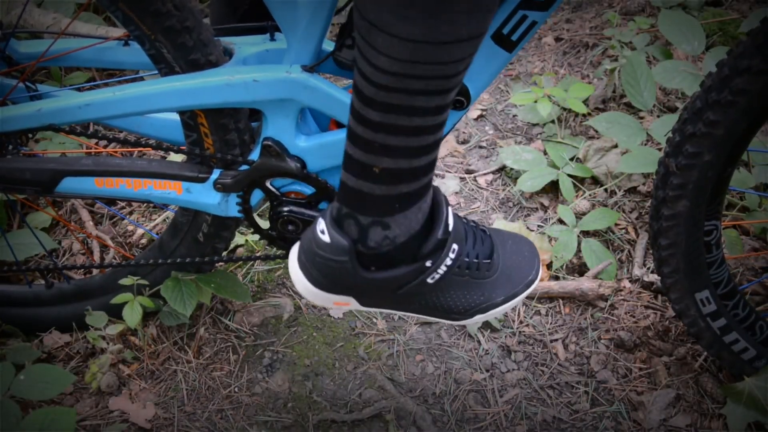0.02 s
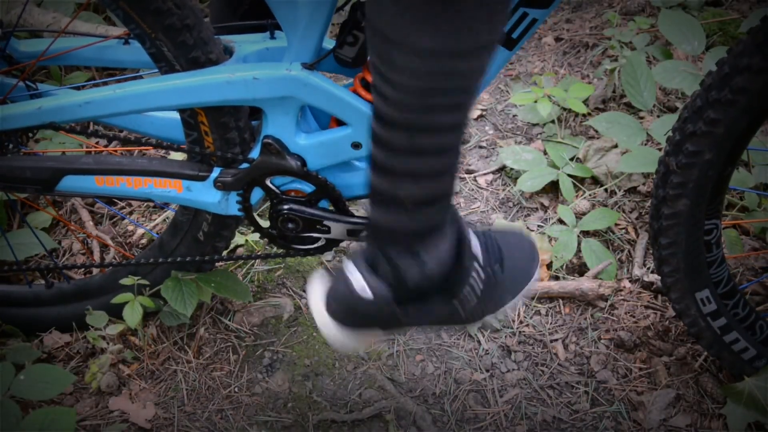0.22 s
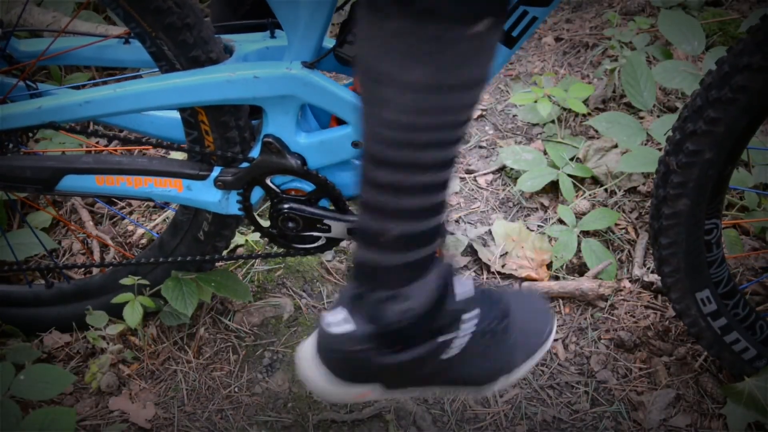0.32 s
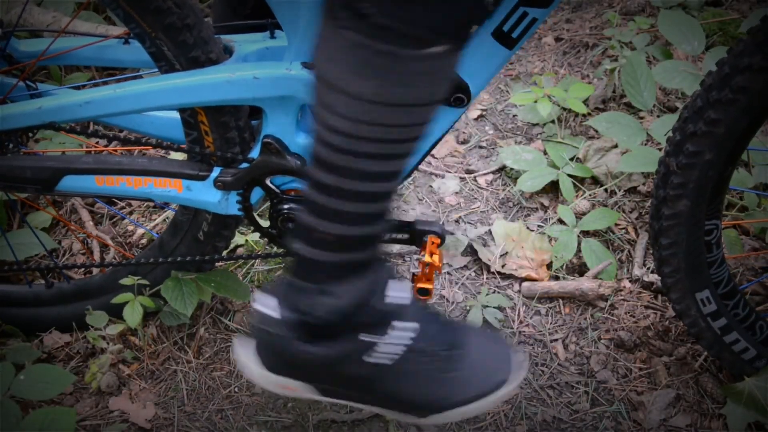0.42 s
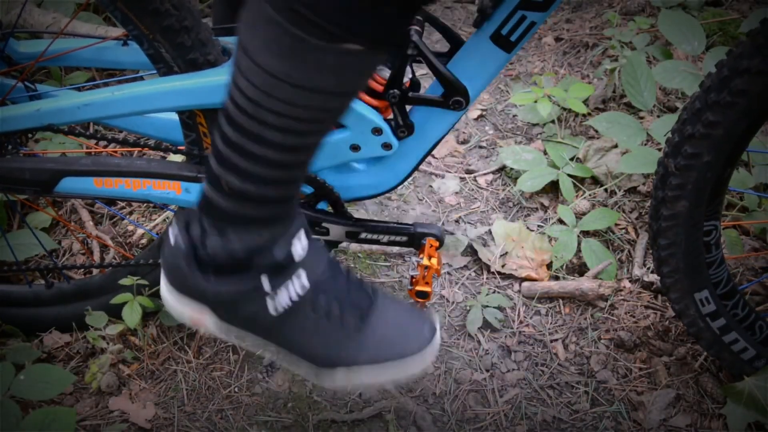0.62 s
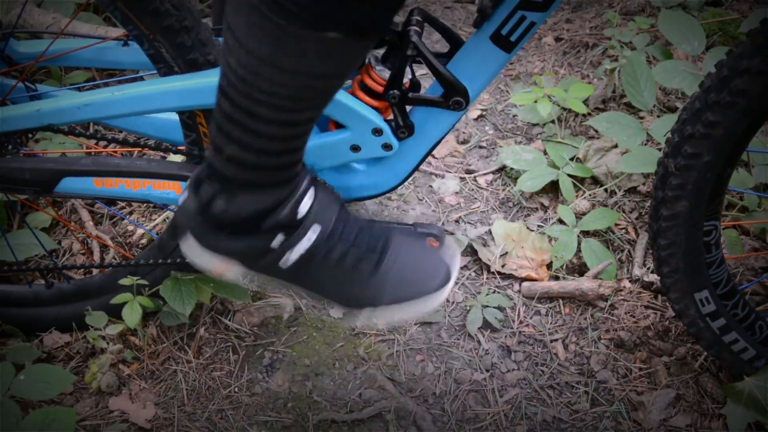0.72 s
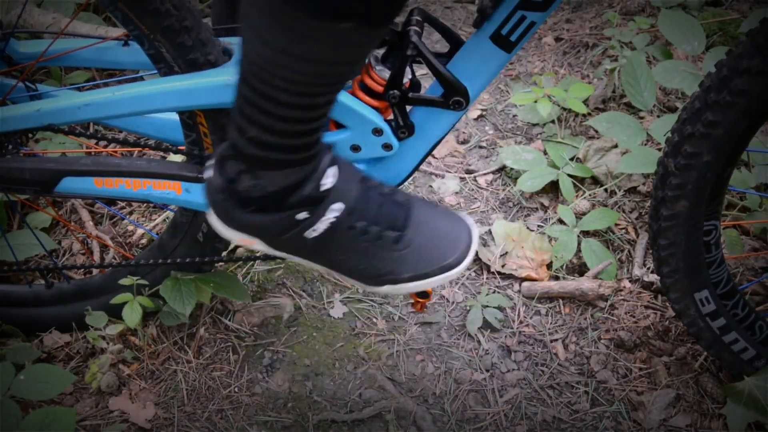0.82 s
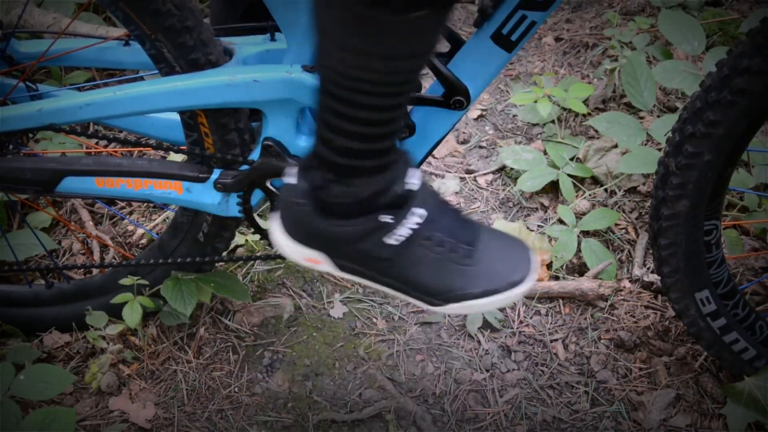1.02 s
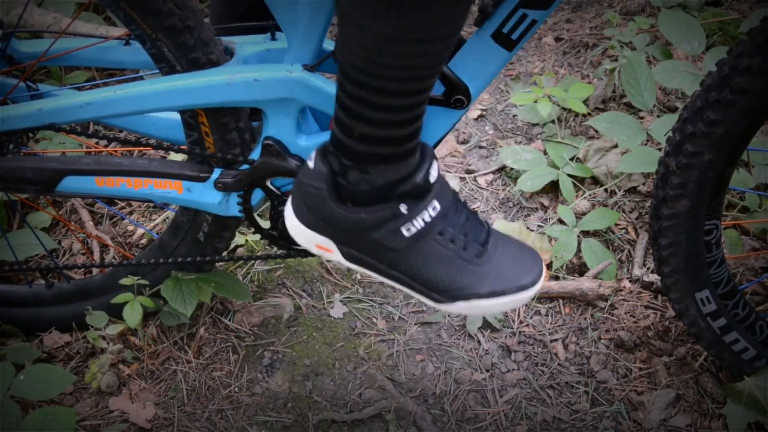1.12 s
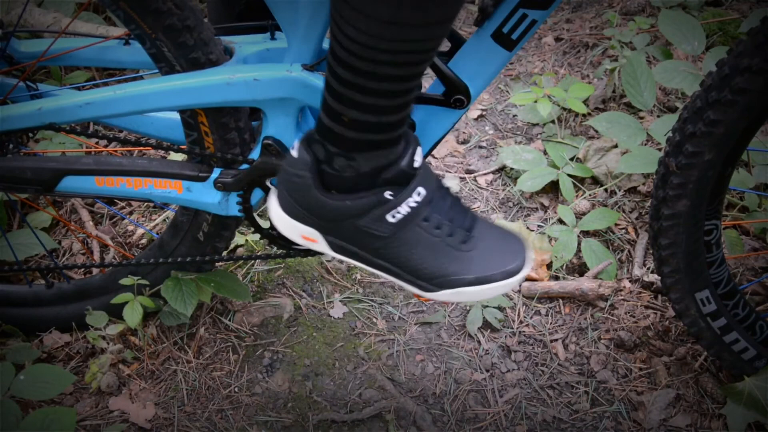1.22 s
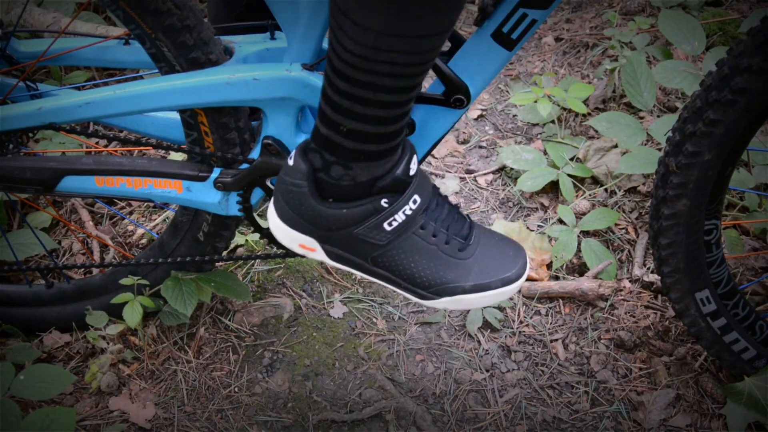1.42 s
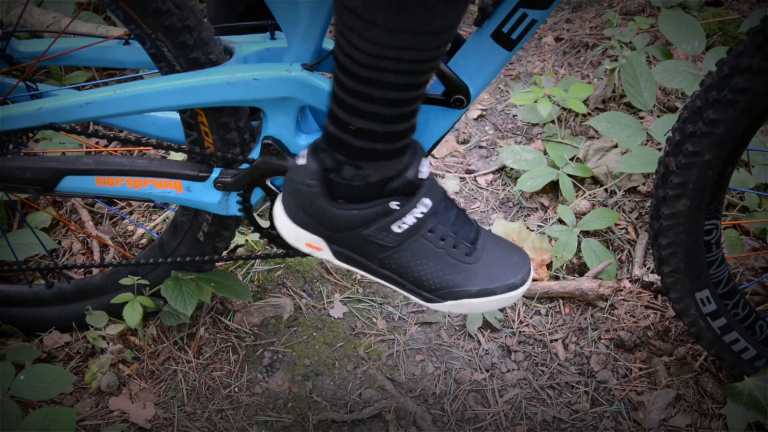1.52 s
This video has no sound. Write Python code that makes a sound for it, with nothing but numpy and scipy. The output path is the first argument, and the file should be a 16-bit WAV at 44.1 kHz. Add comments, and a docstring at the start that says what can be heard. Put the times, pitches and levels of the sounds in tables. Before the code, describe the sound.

A spring-loaded bicycle pedal snaps loudly as a shoe twists out, then ticks and knocks

```python
"""Bicycle pedal release on a forest trail

A shoe twists out of a spring-loaded pedal: the steel jaw snaps shut, loud enough to overload the microphone.
The cleat ticks three times on the free pedal; the sole knocks and scuffs. Trees echo it over a steady hiss.
Impacts are coloured noise bursts plus decaying sine modes, scuffs are swelling noise bursts,
the echo is convolution with a shaped noise tail, and the hiss is filtered noise."""
import sys
import numpy as np
from scipy import signal
from scipy.fft import rfft, irfft
from scipy.io import wavfile
from scipy.ndimage import uniform_filter1d

SR = 44100
rng = np.random.default_rng(int(sys.argv[2]) if len(sys.argv) > 2 else 0)


def pcm_store(signal):
    """Save signal as 16-bit PCM."""
    levels = np.round(np.clip(np.atleast_2d(signal), -1, 1) * 32767)
    wavfile.write(sys.argv[1], SR, levels.astype(np.int16).T)


N = 70560
RING_S = np.arange(8192) / SR  # time axis of one near sound


def snap(crack_db, ring_db, rattle_db, thump_db):
    """The jaw slams home, rings, and shakes the crank and frame."""
    # crack spectrum: freq_hz, level_db
    crack_colour = [(40, -22.5), (150, -22.5), (380, -21.5), (700, -21.5), (1000, -8), (1700, 0),
                    (2050, -10.5), (3100, -1.5), (3520, -8.5), (3950, -3.5), (5800, -2.5), (7600, -9),
                    (8400, -0.5), (9500, -10), (11000, -1), (12800, -12), (13700, -8.5), (15500, -21)]
    # rattle spectrum: freq_hz, level_db
    rattle_colour = [(80, -13.5), (300, -3), (700, 4.5), (1000, -2), (1700, 2.5), (3000, -2.5),
                     (6000, -3.5), (11000, -6), (15500, -18)]
    # jaw and spring modes: freq_hz, level_db, t60_s
    jaw_modes = [(1670, -12, .04), (2640, -11, .04), (3005, -7, .05), (3975, -8, .04), (4190, -9, .04),
                 (4655, -9, .04), (5420, 0, .048), (6280, -8, .04), (7050, -9, .035), (8200, -5, .035),
                 (8540, -2, .028), (10500, -8, .03), (11130, -3, .036), (13600, -10, .033)]
    # crank and frame modes: freq_hz, level_db, t60_s
    frame_modes = [(403.7, -4, 0.01), (685, 0, 0.013), (850, -2, 0.012), (1090, -7, 0.014),
                   (1380, -1, 0.015)]
    crack = burst(blow(hold_s=.0019, t60_s=.0083), crack_colour)
    rattle = burst(blow(hold_s=0, t60_s=.11), rattle_colour)
    out = amp(crack_db) * crack
    out = out + amp(ring_db) * ring(jaw_modes, rise_s=.001)
    out = out + amp(rattle_db) * rattle
    return out + amp(thump_db) * thud(frame_modes)


def tick(crack_db, ring_db, bright_db_per_octave):
    """Steel touches the unloaded pedal, which buzzes and rings briefly."""
    # contact spectrum: freq_hz, level_db
    tick_colour = [(100, -16), (600, -30), (1000, -9), (1500, 8), (2150, 0), (2900, 8.5), (3300, -7.5),
                   (3900, 2), (4700, -4.5), (5300, -3), (6000, -6), (7400, 0), (8800, 2.5), (9500, -6),
                   (14000, -5.5), (15800, -20)]
    # free pedal modes: freq_hz, level_db, t60_s
    pedal_modes = [(910, -12, .04), (1385, -4, .08), (1615, -4, .05), (1770, -9, .04), (2700, -9, .06),
                   (2870, 0, .04), (2970, -6, .03), (3540, -10, .04), (3820, -9, .03), (4360, -7, .04),
                   (5170, -7, .05), (5350, -10, .03), (5950, -11, .03), (6420, -6, .037), (7200, -7, .025),
                   (7520, -4, .03), (8100, -9, .02), (8520, -9, .028), (8870, -8, .028)]
    buzz_db = -14.5
    envelope = blow(hold_s=.0018, t60_s=.0075) + amp(buzz_db) * blow(hold_s=0, t60_s=.11)
    crack = burst(envelope, tick_colour, bright_db_per_octave)
    pedal_ring = ring(pedal_modes, bright_db_per_octave, rise_s=.0001)
    return amp(crack_db) * crack + amp(ring_db) * pedal_ring


def knock(thud_db, pitch_ratio, contact_db, treble_db, top_db, ring_db):
    """The stiff sole thuds; the cleat makes contact just after and rings, damped by the shoe."""
    # sole modes at pitch ratio 1: freq_hz, level_db, t60_s
    sole_modes = [(375, -15.5, .025), (649.6, -10, 0.058), (835, -4, 0.035), (1345, 0.5, .016),
                  (1788, -14.5, 0.01143)]
    # contact spectrum before the treble and top gains: freq_hz, level_db
    contact_colour = [(200, -16), (1000, 0.5), (1900, 6.5), (2600, 2), (3350, 4.5), (3900, -11),
                      (4900, -3.5), (6000, -13), (7000, -4), (8500, -10), (9500, -12), (15500, -12.5)]
    # cleat modes: freq_hz, level_db, t60_s
    cleat_modes = [(3380, 3.5, 0.0073), (4700, -9.5, 0.017), (5497, -11.5, 0.024), (6778, -1, 0.021),
                   (6900, 0.5, .016), (7860, -5, 0.014)]
    treble_hz, top_hz, contact_lag_s = 3700, 9000, .001
    colour = []
    for hz, db in contact_colour:
        extra_db = top_db if hz > top_hz else treble_db if hz > treble_hz else 0
        colour.append((hz, db + extra_db))
    out = amp(thud_db) * thud(sole_modes, pitch_ratio)
    contact = burst(blow(hold_s=.0012, t60_s=.015), colour)
    add(out, contact_lag_s, amp(contact_db) * contact + amp(ring_db) * ring(cleat_modes))
    return out


def scuff(length_s, db, bright_db_per_octave):
    """Sole friction: noise that swells and fades over a half sine."""
    # friction spectrum: freq_hz, level_db
    scuff_colour = [(100, -12), (350, 7), (1000, 11.5), (3300, 3.5), (5200, -9), (6800, -2), (8500, -6.5),
                    (15000, -25)]
    swell = np.sin(np.pi * np.minimum(RING_S / length_s, 1))
    return amp(db) * burst(swell, scuff_colour, bright_db_per_octave)


def burst(envelope, colour, bright_db_per_octave=0):
    """A spray of tiny impacts: enveloped noise, given its colour by a causal filter."""
    size = len(envelope)
    hz = np.fft.rfftfreq(size, 1 / SR)
    spectrum = rfft(rng.standard_normal((2, size)) * envelope)
    own = np.sqrt(uniform_filter1d(abs(spectrum) ** 2, size=61, axis=1) + 1e-12)
    target = amp(read(colour, hz)) * tilt(hz, bright_db_per_octave)
    # folding the cepstrum makes the correction minimum-phase
    cepstrum = irfft(np.log(target / own))
    cepstrum[:, 1:size // 2] *= 2
    cepstrum[:, size // 2 + 1:] = 0
    return unit(irfft(spectrum * np.exp(rfft(cepstrum))))


def blow(hold_s, t60_s):
    """Envelope of a contact: instant rise, optional hold, exponential decay."""
    return np.exp(-np.log(1000) * np.maximum(RING_S - hold_s, 0) / t60_s)


def ring(modes, bright_db_per_octave=0, rise_s=.00025):
    """Dying partials of a struck metal part, with random phases."""
    phases_cycles = rng.random((len(modes), 2, 1))
    out = 0
    for (hz, db, t60_s), phase in zip(modes, phases_cycles):
        gain = amp(db) * tilt(hz, bright_db_per_octave)
        out = out + gain * blow(0, t60_s) * np.sin(2 * np.pi * (hz * RING_S + phase))
    return unit(out * (1 - np.exp(-RING_S / rise_s)))


def thud(modes, pitch_ratio=1):
    """Low, heavily damped modes pushed by one blow; a stiffer contact is higher and shorter."""
    rise_s = .0006
    out = 0
    for k, (hz, db, t60_s) in enumerate(modes):
        sine = np.sin(2 * np.pi * hz * pitch_ratio * RING_S)
        out = out + (-1) ** k * amp(db) * blow(0, t60_s / pitch_ratio) * sine
    centred = np.array([[1], [0]])  # no width component
    return unit(out * (1 - np.exp(-RING_S / rise_s))) * centred


def play(table, source):
    """Sounds every row of a table close to the microphone."""
    # width of near sounds: freq_hz, side_db
    near_side = [(100, -16), (1500, -22), (6500, -27), (9000, -14), (13000, -3)]
    mix = np.zeros((2, N))
    for start_s, *settings in table:
        add(mix, start_s, source(*settings))
    return widen(mix, near_side)


def forest(near):
    """Scattered echoes, swelling as the nearest trunks answer; decay time varies with frequency."""
    # echo spectrum: freq_hz, level_db
    echo_colour = [(100, -4), (600, -6.5), (1500, -2), (3200, 1.5), (5400, -1.5), (9000, 0.5),
                   (15000, -2.5)]
    # echo decay: freq_hz, t60_s
    echo_t60 = [(200, .45), (2000, 0.53), (5500, 0.89), (10000, .55), (15000, 0.74)]
    # echo width: freq_hz, side_db
    echo_side = [(300, -20.5), (1500, -25.5), (3200, -11.5), (6800, -12), (10000, -1.5), (14000, -1)]
    rise_s, trees_s, trees_spread_s, trees_db = .016, .082, .026, 4
    hz, t, z = signal.stft(rng.standard_normal((2, SR)), SR, nperseg=256)
    swell_db = trees_db * np.exp(-((t - trees_s) / trees_spread_s) ** 2)
    decay = np.exp(-np.log(1000) * t / read(echo_t60, hz)[:, None])
    z = z * amp(read(echo_colour, hz)[:, None] + swell_db) * decay
    tail = signal.istft(z, SR, nperseg=256)[1]
    tail = tail * np.minimum(np.arange(tail.shape[1]) / SR / rise_s, 1)
    mono = near.mean(0)[None]
    return signal.fftconvolve(mono, unit(widen(tail, echo_side)), axes=1)[:, :N]


def hiss():
    """Steady far-off rush: filtered noise with faint random patches in time and frequency."""
    # hiss spectrum: freq_hz, relative density_db
    hiss_colour = [(20, -45.5), (45, -35), (65, -7), (100, -11), (200, -12), (300, -10.5), (450, -5),
                   (700, 0.5), (1000, 4), (1400, -0.5), (2000, -9.5), (3000, -20.5), (4500, -27.5),
                   (8000, -31.5), (12000, -35.5), (15500, -40)]
    # hiss width: freq_hz, side_db
    hiss_side = [(60, -21.5), (300, -21), (1000, -18.5), (3000, -5.5), (7000, -9.5), (12000, 0)]
    hiss_db, patch_db = -48, .52
    hz, t, z = signal.stft(rng.standard_normal((2, N)), SR, nperseg=2048, noverlap=1536)
    patches = uniform_filter1d(rng.standard_normal(z.shape[1:]), size=14, axis=0)
    patches = uniform_filter1d(patches, size=6, axis=1)
    z = z * amp(read(hiss_colour, hz)[:, None] + patch_db * patches / patches.std())
    pair = signal.istft(z, SR, nperseg=2048, noverlap=1536)[1][:, :N]
    return amp(hiss_db) * np.sqrt(N) * unit(widen(pair, hiss_side))


def amp(db):
    """Decibels to gain."""
    return 10 ** (np.asarray(db) / 20)


def unit(x):
    """Scales a sound to energy 1, averaged over its channels."""
    return x / np.sqrt(np.mean(np.sum(x ** 2, -1)) + 1e-20)


def read(points, hz):
    """Reads a table on a logarithmic frequency axis."""
    f, value = np.transpose(points)
    return np.interp(np.log(hz + 1), np.log(f), value)


def add(mix, start_s, sound):
    """Mixes a sound in at a time, cut off at the end of the mix."""
    part = mix[:, max(round(start_s * SR), 0):][:, :sound.shape[1]]
    part += sound[:, :part.shape[1]]


def tilt(hz, db_per_octave):
    """Gain that leans a spectrum about 4 kHz, constant below 500 Hz."""
    return amp(db_per_octave * np.log2(np.maximum(hz, 500) / 4000))


def widen(pair, side_table):
    """Turns two unrelated sounds into left and right, the second giving the width."""
    size = pair.shape[1]
    side_gain = amp(read(side_table, np.fft.rfftfreq(size, 1 / SR)))
    side = irfft(rfft(pair[1]) * side_gain, size)
    return np.array([pair[0] + side, pair[0] - side])


def scene():
    """Pedal and shoe close by, their echo, and the hiss."""
    # jaw springing shut: start_s, crack_db, ring_db, rattle_db, thump_db
    snaps = [(0.2390, 15, 4.5, 2, 4.5)]
    # cleat on the free pedal: start_s, crack_db, ring_db, bright_db_per_octave
    tick_rows = [(0.6561, -15, -17.5, 0.9), (0.6886, -15.5, -8.5, -2.7), (0.7506, -8, -6.5, 0.1)]
    # sole and cleat on the pedal: start_s, thud_db, pitch_ratio, contact_db, treble_db, top_db, ring_db
    knocks = [(0.2705, -11.5, 0.87, -12.5, -16, -8, -25.5), (1.0616, -15.5, 0.86, -15.5, -3, -9, -24),
              (1.0710, -14, 0.843, -17, -13, 4, -18.5), (1.0794, 0, 1, -3.5, 3, 2, -6.5),
              (1.0880, -19.5, 0.99, -30, 1, -1, -41), (1.0955, -21, 0.96, -18, -1, -2, -42),
              (1.3891, -18, 1.016, -15, -5, -13.5, -35), (1.5770, -10.5, 1.466, -14, -4.5, -5.5, -38)]
    # sole friction: start_s, length_s, level_db, bright_db_per_octave
    scuffs = [(0.03, 0.057, -23.5, 0), (0.11, 0.051, -29.5, 2), (0.55, 0.18, -33, 8),
              (1.04, 0.061, -13.5, -3), (1.12, 0.037, -23.5, -2.5), (1.331, 0.016, -18, -3.5),
              (1.35, .025, -22, -3)]
    echo_db, snap_send_db, knock_send_db = -23.5, 2.5, -1.5
    shield_hz, left_db = 4500, .5
    air = hiss()
    jaw = play(snaps, snap)
    ticks = play(tick_rows, tick)
    shoe = play(knocks, knock) + play(scuffs, scuff)
    # the shoe shields its own sounds, so less of them, and duller, reaches the trees
    shielded = signal.sosfilt(signal.butter(2, shield_hz, fs=SR, output="sos"), shoe)
    to_trees = amp(snap_send_db) * jaw + ticks + amp(knock_send_db) * shielded
    echo = amp(echo_db) * forest(to_trees)
    return (jaw + ticks + shoe + echo + air) * amp([[left_db], [-left_db]])


def record(dry):
    """Soft overload on the loudest peaks, a low cut, then the band limit."""
    ceiling, low_cut_hz, edge_hz = .95, 50, 15600
    held = dry / (1 + (dry / ceiling) ** 4) ** .25
    held = signal.sosfilt(signal.butter(2, low_cut_hz, "highpass", fs=SR, output="sos"), held)
    band_limit = signal.firwin(255, edge_hz, window=("kaiser", 8), fs=SR)
    return signal.oaconvolve(held, band_limit[None], "same")


dry = scene()
out = record(dry)
pcm_store(out)
```